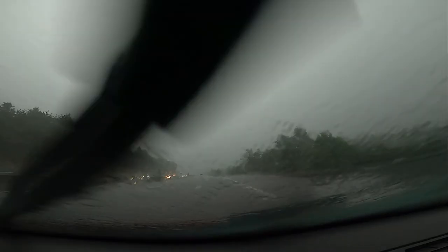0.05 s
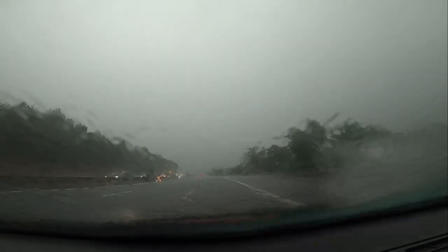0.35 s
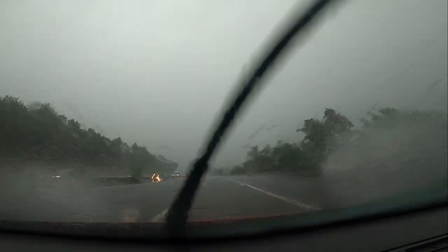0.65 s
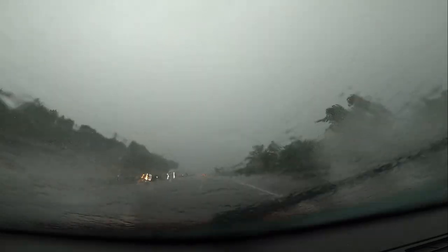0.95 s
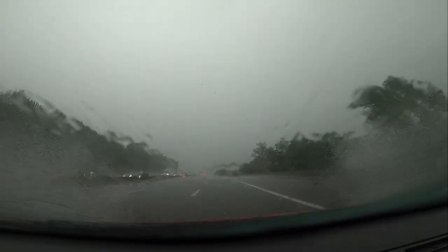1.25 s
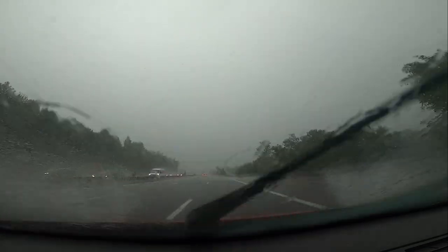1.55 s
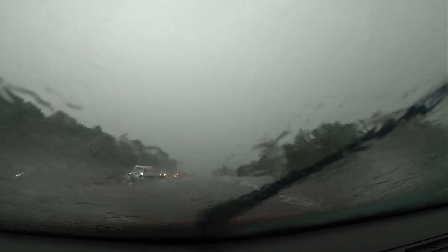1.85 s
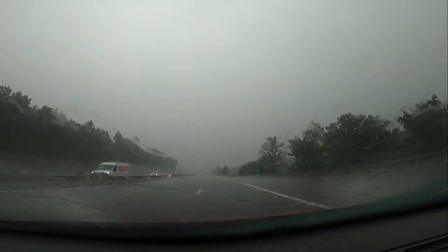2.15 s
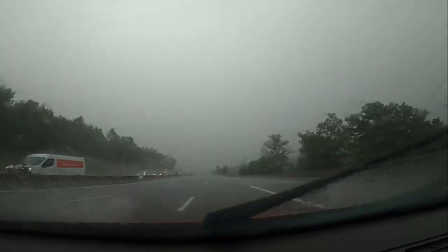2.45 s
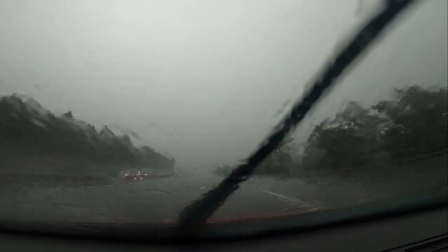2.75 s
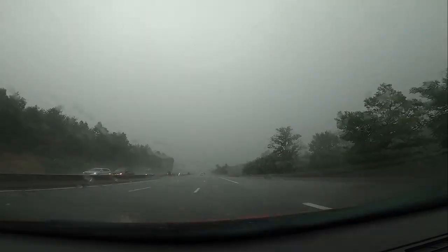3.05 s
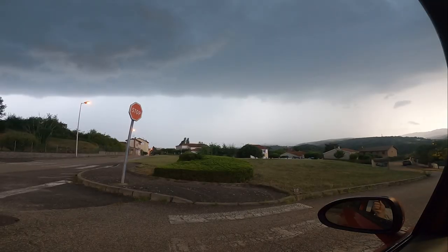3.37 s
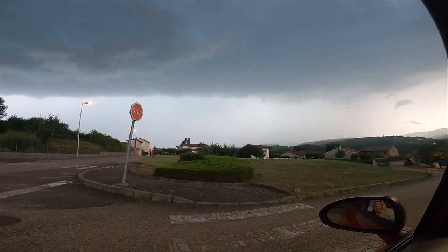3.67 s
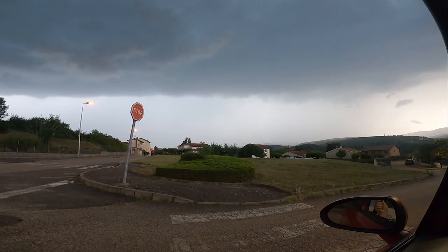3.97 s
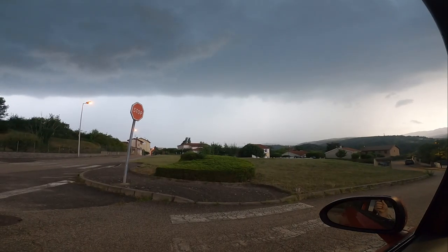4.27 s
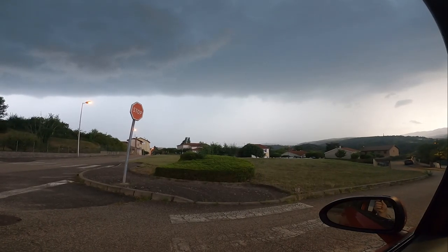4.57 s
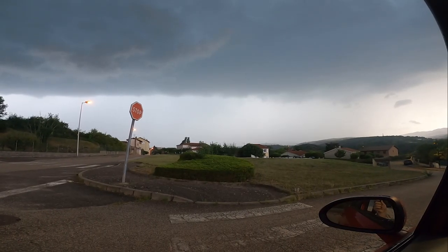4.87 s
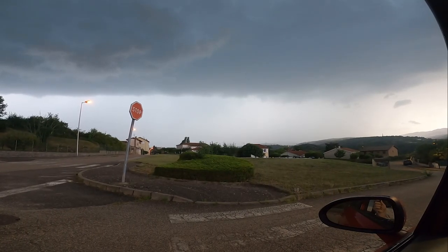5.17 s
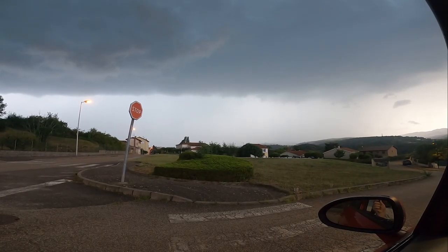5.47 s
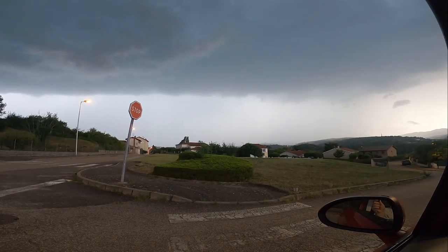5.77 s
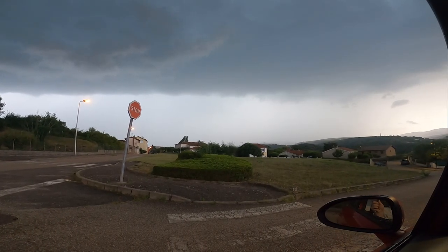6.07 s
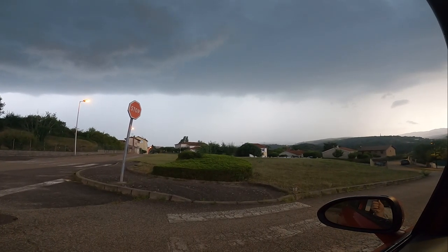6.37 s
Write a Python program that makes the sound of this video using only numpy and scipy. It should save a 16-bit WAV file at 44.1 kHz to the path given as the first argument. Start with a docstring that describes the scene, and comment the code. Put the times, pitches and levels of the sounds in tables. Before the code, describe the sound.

A downpour hisses and spatters on a rumbling car, stopping abruptly before thunder rumbles in three swells.

```python
"""A car drives through a downpour: tyres shake the body into a rumble, drops drum on the resonant roof
panels and burst on the windscreen. The sound cuts to a quiet roadside with far traffic, where a gust
nudges the microphone and a bush cricket's wing ticks faintly. Thunder then rolls in three swells, as
shock fronts arrive from along the lightning channel. The parked car booms along with the late thunder,
and the last swell is weak and dull."""
import sys
import numpy as np
from scipy import signal
from scipy.fft import rfft, irfft, next_fast_len
from scipy.io import wavfile
from scipy.ndimage import uniform_filter1d

SR = 44100
rng = np.random.default_rng(int(sys.argv[2]) if len(sys.argv) > 2 else 0)


def to_wav(s):
    """Save 16-bit WAV."""
    ch = np.atleast_2d(s).T  # columns
    pcm = np.round(np.clip(ch, -1, 1) * 32767)  # PCM
    wavfile.write(sys.argv[1], SR, pcm.astype(np.int16))


N = 283115
CUT_S = 3.198  # the drive gives way to the roadside
TAPS = 16384
TIME = np.arange(N) / SR
HZ = np.fft.rfftfreq(TAPS, 1 / SR) + 1e-3


def amp(db):
    """Decibels to amplitude ratio."""
    return 10 ** (np.asarray(db) / 20)


def curve(rows):
    """Linear interpolation of (time, value) rows, with rounded corners."""
    return uniform_filter1d(np.interp(TIME, *np.transpose(rows)), size=200)


def bumps(rows, half_s):
    """Brief Gaussian changes of level, in dB."""
    return sum(db * np.exp(-((TIME - s) / half_s) ** 2) for s, db in rows)


def swell(start_s, rise_s, hold_s, fade_db_per_s):
    """Envelope with a linear rise, a hold and an exponential decay."""
    age = TIME - start_s
    rise = np.clip(age / max(rise_s, 1e-3), 0, 1)
    return rise * amp(-fade_db_per_s * np.maximum(age - rise_s - hold_s, 0))


def spectrum(points, hz=HZ):
    """Gain of (frequency, level) rows on a log-frequency axis."""
    f, db = np.transpose(points)
    return amp(np.interp(np.log(hz + 1), np.log(f + 1), db))


def band(lo_hz, hi_hz, order=16):
    """Gain of a steep band-pass."""
    return 1 / np.sqrt((1 + (lo_hz / HZ) ** order) * (1 + (HZ / hi_hz) ** order))


def resonances(modes):
    """Gain of resonance peaks on a flat response."""
    return amp(sum(db / (1 + (2 * (HZ - hz) / width) ** 2) for hz, width, db in modes))


def impulse(gain):
    """Minimum-phase impulse response with this spectral shape."""
    log_gain = np.log(np.maximum(gain / gain.max(), 1e-5))
    mirrored = np.concatenate([log_gain, log_gain[-2:0:-1]])
    return np.fft.ifft(np.exp(np.conj(signal.hilbert(mirrored)))).real[:TAPS // 2]


def steady(pair, size):
    """Holds the running rms over `size` samples at 1."""
    return pair / np.sqrt(abs(uniform_filter1d(pair ** 2, size, axis=1)) + 1e-20)


def colour(pair, gain, size=6000):
    """Filters a pair of signals to a steady rms of 1."""
    return steady(signal.oaconvolve(pair, impulse(gain)[None], axes=1)[:, :N], size)


def add(mix, s, sound):
    """Superposes a sound on a signal at time s."""
    part = mix[max(round(s * SR), 0):][:len(sound)]
    part += sound[:len(part)]


def noise():
    """Two uncorrelated white noises."""
    return rng.standard_normal((2, N))


def flutter(rate_hz):
    """Low-passed random fluctuation with a standard deviation of 1."""
    hz = np.fft.rfftfreq(N, 1 / SR)
    slow = irfft(rfft(rng.standard_normal(N)) / (1 + (hz / rate_hz) ** 2), N)
    return slow / slow.std()


def fade(energy, decay_s):
    """Damping spreads each packet of energy over an exponential tail."""
    pole = np.exp(-1 / (decay_s * SR))
    return signal.lfilter([1 - pole], [1, -pole], energy)


def impacts(per_s, spread_db, crack_s, tail_s, tail_db, clump_db, clump_hz):
    """Shot-noise envelope: random blows, each a crack and an echo tail, add in energy."""
    size = amp(spread_db * np.minimum(rng.exponential(1, N), np.pi) + clump_db * flutter(clump_hz))
    energy = size ** 2 * (rng.random(N) < per_s / SR)
    return np.sqrt(fade(energy, crack_s) + amp(tail_db) ** 2 * fade(energy, tail_s) + 1e-9)


def ringing(blows, gain, modes, share):
    """Modal excitation: a changing share of the blows' power passes through resonances."""
    share = np.clip(curve(share), 0, 1)
    plain = colour(blows * noise(), gain)
    rung = colour(blows * noise(), gain * resonances(modes))
    return np.sqrt(1 - share) * plain + np.sqrt(share) * rung


# spectrum of the body's rumble: (frequency [Hz], relative level [dB])
ROAD_SPECTRUM = [(7.1, -42), (12, -4.5), (48, 2), (98, -4), (200, -3.5), (260, -32), (440, -120)]


def road(level_db=-24.5):
    """Forced vibration: tyres on the wet road shake the car body, which resonates at one low note."""
    body = spectrum(ROAD_SPECTRUM) * band(12, 130) * resonances([(69, 3.3, 2.1)])
    return amp(level_db) * colour(noise(), body, size=3500)


# spectrum of drops heard through the roof: (frequency [Hz], relative level [dB])
ROOF_SPECTRUM = [(59, -30), (100, 5), (183, 1), (371, -4), (447, -6), (538, -7.5), (686, -8.5),
                 (762, -12.5), (906, -10), (1600, -27), (2080, -57), (3520, -120)]
# roof panel resonances: (frequency [Hz], bandwidth [Hz], gain [dB])
PANEL_MODES = [(190, 28, 3), (243, 35, 3.5), (459, 76, 7.5), (603, 47, 4), (700, 69, 8.5), (920, 48, 3.5)]
# part of the drumming that rings in the panels: (time [s], power share [0-1])
PANEL_SHARE = [(1.6, 0.96), (2.2, 0.28)]
# strength of the drumming: (time [s], level [dB])
ROOF_LEVEL = [(0.03, -23.5), (0.16, -22), (1.68, -22), (3.13, -25), (3.17, -23.5)]


def roof(wander_db=0.42, wander_hz=8):
    """Impact excitation: drops ring the roof panels, whose lining passes only the low thud."""
    blows = impacts(per_s=2200, spread_db=0, crack_s=0.00085, tail_s=0.027, tail_db=5,
                    clump_db=0.76, clump_hz=20)
    level = amp(curve(ROOF_LEVEL) + wander_db * flutter(wander_hz))
    return level * ringing(blows, spectrum(ROOF_SPECTRUM) * band(128.3, 1260), PANEL_MODES, PANEL_SHARE)


# spectrum of drops on glass: (frequency [Hz], relative level [dB])
GLASS_SPECTRUM = [(530, -25), (900, 13), (1090, -5), (1300, -5.5), (1420, -8.5), (2220, -9), (2760, -7.5),
                  (3070, -8.5), (3380, -13), (5440, -22), (6980, -30), (7960, -40.5), (10500, -48),
                  (14100, -70.5), (15500, -85)]
# force of the rain on the windscreen: (time [s], relative level [dB])
RAIN_FORCE = [(0.03, -36), (0.62, -37), (0.92, -34.5), (1.28, -35.5), (1.47, -38.0), (1.77, -33.5),
              (1.96, -35), (2.14, -32.5), (2.29, -37.0), (2.5, -31.5), (2.72, -31.5), (2.86, -34),
              (2.96, -29.5), (3.17, -35)]
# sheets of water splashing on the glass: (time [s], change of force [dB])
RAIN_SPLASHES = [(0.345, 5), (0.865, 4), (1.815, 4.5), (2.77, 2)]
# brief lulls in the spatter: (time [s], change of force [dB])
RAIN_LULLS = [(0.56, -5), (1.11, -3.5), (1.39, -4), (1.61, -5.5), (2.81, -4.5)]


def windscreen(spatter_db=3, spray_db=-8, spatter_follow=0.87, spray_follow=1.16,
               ring_hz=2850, ring_width_hz=450, ring_db=1.5):
    """Impact noise: drops burst on the glass into spatter and fine spray, which grows faster with force."""
    blows = impacts(per_s=4200, spread_db=3.5, crack_s=0.00042, tail_s=0.022, tail_db=-5.5,
                    clump_db=1.42, clump_hz=35)
    force = curve(RAIN_FORCE) + bumps(RAIN_SPLASHES, half_s=0.018) + bumps(RAIN_LULLS, half_s=0.022)
    usual = np.mean(force[TIME < CUT_S])
    glass, ring = spectrum(GLASS_SPECTRUM), resonances([(ring_hz, ring_width_hz, ring_db)])
    spatter = colour(blows * noise(), glass * band(1177, 4020) * ring)
    spray = colour(blows * noise(), glass * band(3790, 16000))
    return (amp(usual + spatter_db + spatter_follow * (force - usual)) * spatter
            + amp(usual + spray_db + spray_follow * (force - usual)) * spray)


def droplets(level_db=-10.5, per_s=60, spread_db=2.5):
    """Poisson arrivals: small hard drops tick on the glass, louder as the rain grows."""
    size = amp(level_db + curve(RAIN_FORCE) + spread_db * np.minimum(rng.exponential(1, N), np.pi))
    hits = size * (rng.random(N) < per_s / SR)
    tick = impulse(spectrum(GLASS_SPECTRUM) * band(7000, 15000, order=12))
    out = np.zeros((2, N))
    out[0] = signal.oaconvolve(hits, tick / abs(tick).max())[:N]
    return out


# large drops on the windscreen: (time [s], relative ring level [dB], relative click level [dB])
DROP_HITS = [(0.4994, -17, -52), (0.8596, -25, -51), (0.9604, -28, -55), (1.1314, -26, -61),
             (1.1764, -26, -46), (1.209, -25, -55), (1.5313, -28, -56), (1.5775, -29, -54),
             (1.812, -22, -54), (2.0568, -31, -55), (2.392, -23.5, -52.5), (2.4756, -20.5, -52),
             (2.641, -25.5, -49), (2.687, -24, -53), (2.7571, -20.5, -55)]


def fat_drops(level_db=-1.5, click_db=19, ring_hz=4700, ring_spread=0.096, width_hz=2000, ring_db=10,
              crack_s=0.0013, tail_s=0.004, tail_db=-18):
    """Damped resonance: each large drop clicks and rings the glass, at a pitch that varies by spot."""
    out, t = np.zeros((2, N)), np.arange(TAPS // 16) / SR
    glass = spectrum(GLASS_SPECTRUM)
    click = impulse(glass * band(6300, 15000, order=12))
    decay = np.exp(-t / crack_s) + amp(tail_db) * np.exp(-t / tail_s)
    for s, db, sharp_db in DROP_HITS:
        hz = ring_hz * (1 + ring_spread * rng.standard_normal())
        spot = impulse(glass * band(4100, 15000, order=8) * resonances([(hz, width_hz, ring_db)]))
        ring = signal.fftconvolve(rng.standard_normal(len(t)) * decay, spot)
        add(out[0], s, amp(db + level_db) * ring / abs(ring).max())
        add(out[0], s, amp(sharp_db + click_db) * click / abs(click).max())
    return out


# spectrum of far traffic: (frequency [Hz], relative level [dB])
TRAFFIC_SPECTRUM = [(76, -27.5), (130, 4), (190, -1.5), (313, -11), (414, -11), (542, -23), (872, -24),
                    (1010, -13), (1660, -29.5), (2150, -27.5), (2400, -35.5), (3120, -61), (5280, -120)]
# spectrum of the roadside hiss: (frequency [Hz], relative level [dB])
HISS_SPECTRUM = [(1290, -30), (2200, 1), (3740, -7), (5680, -8), (7280, -15), (8020, -20.5), (8900, -24.5),
                 (11100, -31), (15000, -34)]
# strength of that hiss: (time [s], level [dB])
HISS_ENVELOPE = [(3.25, -75.5), (4.17, -77), (4.83, -80), (5.26, -77), (5.57, -83), (6.17, -77), (6.4, -79)]


def traffic_and_hiss(traffic_db=-51.5, tyres_db=-61, nearest_s=4.1, tyres_db_per_s=14):
    """Incoherent sources add: far traffic, one car that is loudest when nearest, and a faint hiss."""
    traffic = amp(traffic_db) * colour(noise(), spectrum(TRAFFIC_SPECTRUM) * band(110, 2000))
    passing = amp(tyres_db - tyres_db_per_s * abs(TIME - nearest_s))
    tyres = passing * colour(noise(), band(350, 950, order=6))
    hiss = amp(curve(HISS_ENVELOPE)) * colour(noise(), spectrum(HISS_SPECTRUM) * band(2400, 18000))
    return traffic + tyres + hiss


# spectrum of wind on the microphone: (frequency [Hz], relative level [dB])
GUST_SPECTRUM = [(7.1, -24.5), (12, 1), (27, -10.5), (38, -3), (61, -1.5), (107, -21.5), (250, -38),
                 (320, -63.5), (550, -120)]
# one pressure pulse: (time [s], peak level [dB], frequency [Hz])
WIND_BUFFET = (3.331, -22, 46)


def wind(level_db=-37, lump_db=2, lump_hz=12):
    """Turbulent pressure: a lumpy gust swells on the microphone, with one push-and-pull buffet."""
    gust = amp(level_db + lump_db * flutter(lump_hz))
    gust *= swell(start_s=3.176, rise_s=0.15, hold_s=0.08, fade_db_per_s=26)
    out = gust * colour(noise(), spectrum(GUST_SPECTRUM) * band(10, 130), size=4000)
    s, db, hz = WIND_BUFFET
    phase = 2 * np.pi * hz * (TIME - s)
    out[0] -= amp(db) * phase * np.exp((1 - phase ** 2) / 2)
    return out


# bush cricket chirps: (time [s], relative level [dB])
WING_STROKES = [(3.2344, -74), (3.487, -74), (3.689, -73), (3.8851, -73), (4.1375, -72), (4.4348, -77),
                (4.7591, -79), (4.9504, -77), (5.1332, -77), (5.2944, -77.5), (5.5344, -80), (5.9389, -79),
                (6.1449, -76.5)]


def cricket(level_db=-6, pitch_hz=8850, width_hz=230, decay_s=0.032, rise_s=0.005, rasp_db=-15):
    """Stridulation: short rasps of a wing ring one high, narrow resonance."""
    strokes, t = np.zeros(N), np.arange(TAPS // 4) / SR
    stroke = np.minimum(t / rise_s, 1) * np.exp(-t / decay_s)
    for s, db in WING_STROKES:
        add(strokes, s - rise_s, amp(db + level_db) * stroke)
    wing = 1 / (1 + ((HZ - pitch_hz) / width_hz) ** 2) + amp(rasp_db) * band(8500, 10200, order=40)
    return strokes * colour(noise(), wing)


# spectrum of the thunder: (frequency [Hz], relative level [dB])
THUNDER_SPECTRUM = [(8.8, -45.5), (15, -24.5), (27, -7), (109, 2.5), (176, -1), (266, -6.5), (298, -9),
                    (419, -13.5), (564, -21.5), (677, -23), (890, -32), (1120, -35.5), (1200, -39.5),
                    (1850, -50.5), (3500, -80), (4550, -105), (7700, -120)]
# one peal for each stretch of the lightning channel: (start [s], rise [s], hold [s], decay [dB/s],
# boom level [dB], sub-bass level [dB], crackle level [dB])
THUNDER_PEALS = [(4.077, .02, 0.15, 51, -26.5, -39, -39), (4.229, .05, .2, 40, -23, -29, -31.5),
                 (4.778, .03, .06, 39.5, -39.5, -36, -39.5), (4.994, .01, .06, 48, -30, -42, -38.5),
                 (5.068, 0.028, 0.12, 60, -24, -31.5, -34), (5.252, .03, 0.18, 63.5, -22, -25, -31.5),
                 (5.68, 0.052, 0.17, 26, -34, -39.5, -43), (5.949, .05, 0.16, 37, -32, -39, -40)]
# crackle from the near end of the channel: (time [s], power share [0-1])
NEAR_SHARE = [(4.4, 0.83), (4.7, .3), (5.3, 0.04)]
# resonances of the parked car: (frequency [Hz], bandwidth [Hz], gain [dB])
CABIN_MODES = [(177.5, 17, 9), (327.7, 18, 10)]
# part of the boom that rings in the car: (time [s], power share [0-1])
CABIN_SHARE = [(5.4, 0.18), (5.9, .6)]


def thunder(crackle_lag_s=0.013, bark_hz=1080, bark_width_hz=550, bark_db=7):
    """An extended source: the lightning channel's shock fronts arrive in peals, dulled by distance."""
    fronts = impacts(per_s=1300, spread_db=1.5, crack_s=0.0005, tail_s=0.023, tail_db=-0.5,
                     clump_db=1.5, clump_hz=25)
    power = sum((amp(levels)[:, None] * swell(s, rise, hold, fall)) ** 2
                for s, rise, hold, fall, *levels in THUNDER_PEALS)
    boom, depth, crackle = np.sqrt(power)
    roll = spectrum(THUNDER_SPECTRUM)
    sub = depth * colour(fronts * noise(), roll * band(15, 90), size=3000)
    body = boom * steady(ringing(fronts, roll * band(90, 367), CABIN_MODES, CABIN_SHARE), size=2200)
    # near fronts keep a bark that air absorption takes out of far ones
    rasp = ringing(fronts, roll * band(389, 3000), [(bark_hz, bark_width_hz, bark_db)], NEAR_SHARE)
    crackle = np.interp(TIME - crackle_lag_s, TIME, crackle)  # each peal opens with its boom
    return sub + body + crackle * steady(rasp, size=2200)


# the strongest shock fronts: (time [s], relative peak level [dB])
SHOCK_FRONTS = [(4.115, -20), (4.147, -21), (4.266, -13.5), (4.287, -10), (4.302, -9.5), (4.374, -12.5),
                (4.414, -16), (4.466, -14), (4.551, -15), (4.628, -21), (4.827, -25), (5.001, -18.5),
                (5.092, -15.5), (5.276, -11), (5.37, -12.5), (5.419, -13), (5.482, -15.5), (5.762, -26),
                (5.973, -22.5)]


def claps(level_db=-2, snap_hz=700, snap_width_hz=700, snap_db=5):
    """Pressure impulses: the strongest fronts stand out of the roll as single thuds."""
    snap = resonances([(snap_hz, snap_width_hz, snap_db)])
    thud = impulse(spectrum(THUNDER_SPECTRUM) * band(100, 1400, order=6) * snap)
    out = np.zeros((2, N))
    for s, db in SHOCK_FRONTS:
        add(out[0], s, amp(db + level_db) * thud / abs(thud).max())
    return out


# low notes in the roll: (start [s], duration [s], frequency [Hz], level [dB])
BOOM_NOTES = [(4.4, .3, 176, -26), (5.141, .14, 138, -26.5), (5.803, .46, 114.7, -30),
              (6.0, .23, 172, -34.5), (6.01, 0.23, 323.3, -40)]


def booms(edge_s=0.083, drift=0.012, waver_db=1.5, waver_hz=10):
    """Random modulation: the rumble gathers on brief low notes that waver in pitch and level."""
    out = np.zeros((2, N))
    for s, length, hz, db in BOOM_NOTES:
        gate = np.clip(np.minimum(TIME - s, s + length - TIME) / edge_s, 0, 1)
        cycles = np.cumsum(hz * (1 + drift * flutter(waver_hz))) / SR
        level = amp(db + waver_db * flutter(waver_hz))
        out[0] += level * gate * np.sqrt(2) * np.sin(2 * np.pi * cycles)
    return out


# coherent part of the right channel: (frequency [Hz], level relative to left [dB])
RIGHT_COHERENT = [(105, -34), (130, -10), (160, -3.5), (300, 0.5), (550, 3), (1000, 1), (1800, -4.5),
                  (3100, -8.5), (4200, -16), (5200, -43)]
# its incoherent part during the drive: (frequency [Hz], level relative to left [dB])
DRIVE_INCOHERENT = [(90, -23.5), (500, -22), (2800, -15.5), (5000, -28.5), (7000, -25.5), (10000, -24),
                    (14000, -15)]
# its incoherent part at the roadside: (frequency [Hz], level relative to left [dB])
ROADSIDE_INCOHERENT = [(60, -23), (200, -18), (1000, -23.5), (3000, -9), (6000, -14), (11000, -10.5)]


def stereo(pair, incoherent):
    """Partial coherence: the right channel leads by a quarter cycle; bass and treble lean left."""
    size = next_fast_len(N + TAPS)
    hz = np.fft.rfftfreq(size, 1 / SR)
    left, other = rfft(pair, size)
    early, loose = spectrum(RIGHT_COHERENT, hz), spectrum(incoherent, hz)
    right = 1j * early * left + loose * other
    centre_gain = np.sqrt(1 + early ** 2 + loose ** 2) / 2
    return irfft(np.array([left, right]) / centre_gain, size)[:, :N]


def scene():
    """Superposition: the drive through the rain, then a hard cut to the roadside under the storm."""
    drive = road() + roof() + windscreen() + fat_drops() + droplets()
    roadside = traffic_and_hiss() + wind() + cricket() + thunder() + booms() + claps()
    return np.where(TIME < CUT_S, stereo(drive, DRIVE_INCOHERENT), stereo(roadside, ROADSIDE_INCOHERENT))


def record(dry, edge_hz=15200):
    """Band limiting: a steep low-pass removes the highest treble."""
    low_pass = signal.firwin(511, edge_hz, window=("kaiser", 9), fs=SR)
    return signal.oaconvolve(dry, low_pass[None], "same")


dry = scene()
out = record(dry)
to_wav(out)
```